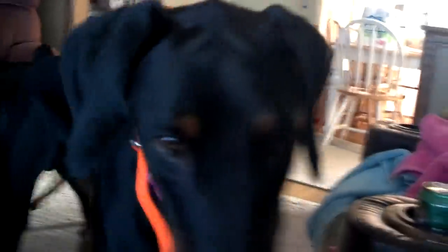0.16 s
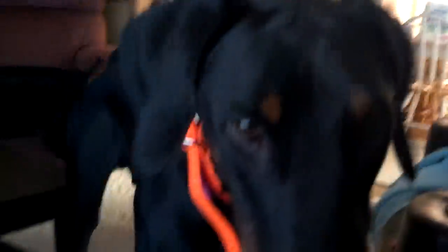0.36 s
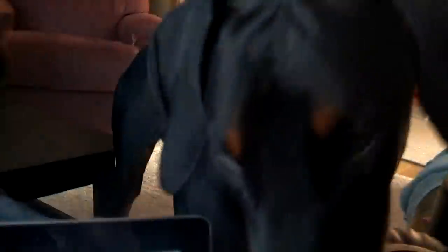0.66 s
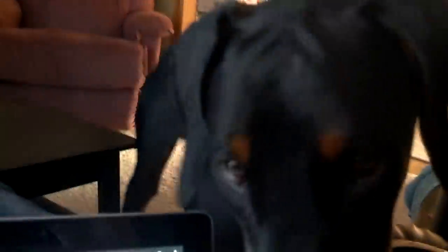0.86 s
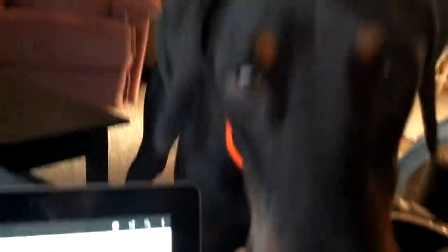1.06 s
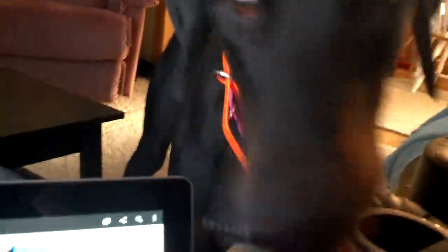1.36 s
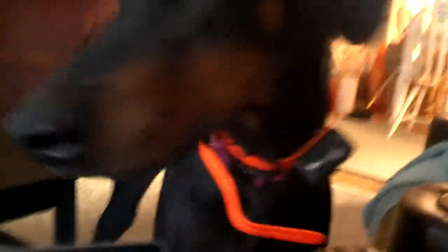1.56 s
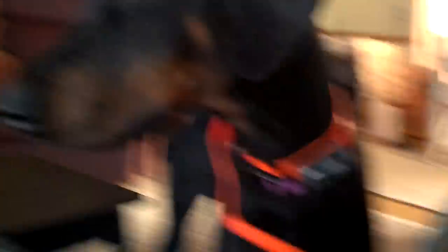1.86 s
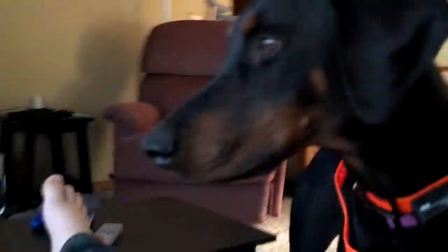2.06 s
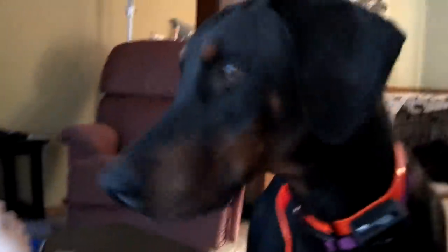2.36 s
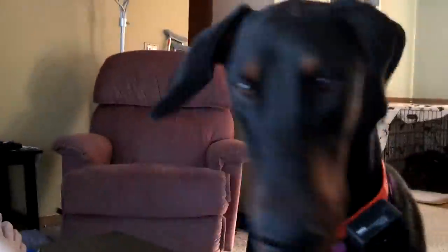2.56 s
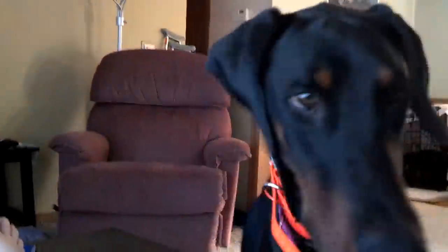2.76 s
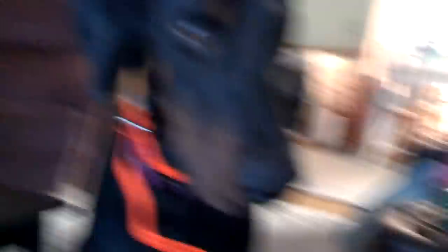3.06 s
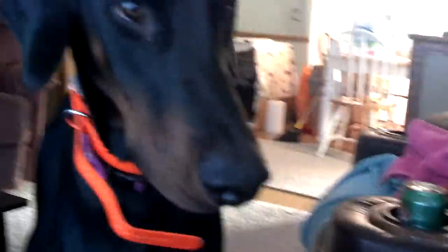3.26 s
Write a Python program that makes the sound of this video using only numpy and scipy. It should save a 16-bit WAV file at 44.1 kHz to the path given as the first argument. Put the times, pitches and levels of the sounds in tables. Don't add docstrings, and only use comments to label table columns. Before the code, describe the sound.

Dog barking indoors: one single bark, a pause, then rapid barks with a second dog's higher yelps.

```python
import sys
import numpy as np
from scipy import signal
from scipy.fft import rfft, irfft
from scipy.io import wavfile
from scipy.ndimage import uniform_filter1d

SR = 44100
rng = np.random.default_rng(int(sys.argv[2]) if len(sys.argv) > 2 else 0)


def materialize(psi):
    bounded = np.clip(np.atleast_2d(psi).T, -1, 1)
    quanta = np.round(bounded * 32767).astype(np.int16)
    wavfile.write(sys.argv[1], SR, quanta)


def magnitude_from_level(level_db):
    exponent = np.asarray(level_db, float) / 20
    return 10 ** exponent


N = 149940


def evened(x):
    return x / np.sqrt(np.mean(x ** 2) + 1e-20)


def colour(x, points):
    f_hz, level_db = np.transpose(points)
    hz = np.fft.rfftfreq(x.shape[-1], 1 / SR)
    gain = magnitude_from_level(np.interp(np.log(hz + 1), np.log(f_hz), level_db))
    return irfft(rfft(x) * gain, x.shape[-1])


def add(mix, start_s, sound):
    part = mix[round(start_s * SR):][:len(sound)]
    part += sound[:len(part)]


def pair(common, other, apart):
    other = colour(other, apart)
    return np.array([common + other, common - other]) / np.sqrt(2)


def floor():
    # [f/Hz, level/dB]
    noise_line = [(30, -21), (70, -19.5), (130, 1.5), (500, -9), (1000, -19.5), (2000, -25), (5000, -34.5),
                  (10000, -39), (15000, -34)]
    # [f/Hz, level/dB]
    noise_apart = [(50, -6.5), (150, -8), (400, -7), (1000, -0.5), (15000, 0)]
    level_db, swell_db, sag_db_per_s = -51, 0.53, -0.5
    t = np.arange(N) / SR
    swell = sum(np.sin(2 * np.pi * (f * t + rng.random())) / np.sqrt(f) for f in np.geomspace(.5, 12, 12))
    noise = evened(colour(rng.standard_normal((2, N)), noise_line))
    gain = magnitude_from_level(level_db + swell_db * evened(swell) + sag_db_per_s * t)
    return gain * pair(*noise, noise_apart)


def resonate(x, hz, width_hz):
    turn = np.exp(2j * np.pi * np.cumsum(hz * np.ones(len(x))) / SR)
    r = np.exp(-np.pi * width_hz / SR)
    return 2 * (turn * signal.lfilter([1 - r], [1, -r], x / turn + 1e-18)).real


def vocal_folds(t, snap_s, hz, rough, half):
    rough_top, lead_rough, jitter = .2, .35, .13
    wobble, breath = rng.standard_normal((12000, 2))[:len(t)].T
    rough = min(rough, rough_top) + lead_rough * np.interp(t, snap_s, [1, 0])
    rough = np.clip(rough, 0, 1)
    wobble = evened(uniform_filter1d(wobble, size=150))
    turns = np.cumsum(hz * (1 + jitter * rough * wobble)) / SR
    folds = 0
    for k in range(1, 44):
        share = half if k % 2 else 1
        folds = folds + share * np.cos(np.pi * k * turns) * (k * hz.max() < 24000)
    puffs = (0.22 + np.exp(-(turns % 1) / 0.45)) * breath
    return (1 - rough) * evened(folds) + rough * evened(puffs)


def bark(throat, rows, rough, half, mouth, tilt_db, nose_db):
    nose_hz, nose_width_hz, nose_level_db = 1740, 110, -22
    flash_db, flash_s, shut_power = 2, 0.032, 0.6
    swell_s, chest_hz = .018, 305.6
    s, pitch_hz, effort_db = np.transpose(rows)
    t = np.arange(s[0], s[-1], 1 / SR)
    hz = uniform_filter1d(np.interp(t, s, pitch_hz), size=300)
    drive = vocal_folds(t, s[1:3], hz, rough, half)
    slope_db = tilt_db + flash_db * np.exp(-abs(t - s[2]) / flash_s)
    nose = (nose_hz / mouth, nose_width_hz, nose_level_db + nose_db)
    out = 0
    for k, (f, width_hz, db) in enumerate([*throat, nose]):
        at_hz = f * (mouth if f > 900 else 1) * (hz / hz.max()) ** shut_power
        ring = resonate(resonate(drive, at_hz, 1.53 * width_hz), at_hz, 1.23 * width_hz)
        out = out + (-1) ** k * magnitude_from_level(db + slope_db * np.log2(f / 500)) * ring
    swell = np.minimum((t - s[0]) / swell_s, 1)
    out = magnitude_from_level(np.interp(t, s, effort_db)) * swell * evened(out)
    return signal.sosfilt(signal.butter(6, chest_hz, "high", fs=SR, output="sos"), out)


def dog(barks, voices, throat):
    out = np.zeros(N)
    for rows, voice in zip(barks, voices):
        add(out, rows[0][0], bark(throat, rows, *voice))
    return out


def deep_dog():
    # [roughness/0-1, half-pitch share/1, mouth opening/1, tilt/dB per octave, nose ring/dB]
    voices = [(0.29, 0.48, 1.132, -1.63, 21), (0.31, .3, 1.07, -0.86, -25.5),
              (0.39, 0.3, 1.072, -1.72, -24), (0.33, 0.41, 1.097, -0.74, 11.5), (0.3, 0.52, 1.04, 1.17, -1),
              (0.62, 0.31, 1.047, -1.3, 21.5)]
    # [f/Hz, width/Hz, level/dB]
    throat = [(361, 130, -10.5), (466, 209, 9.5), (1060, 344, -3.5), (1374, 191, -7), (2110, 437, -21),
              (3094, 167, -32.5), (5290, 1870, -34.5), (6110, 3200, -37.5), (8600, 940, -47)]
    # [t/s, pitch f/Hz, effort level/dB]
    bark_1 = [(.222, 402.5, -28), (.241, 472.8, -25.5), (.249, 508.6, -17), (.265, 540, -20.5),
              (.29, 499.3, -26.5), (.33, 458.5, -29.5), (.35, 454, -49)]
    bark_2 = [(1.478, 344.4, -34.5), (1.514, 429.7, -24), (1.531, 518.7, -18.5), (1.551, 500.8, -25.5),
              (1.589, 461.1, -27.5), (1.642, 450.6, -28), (1.67, 424, -38.5)]
    bark_3 = [(1.728, 392, -4), (1.744, 420.4, -27), (1.754, 506.3, -19.5), (1.779, 481.4, -22),
              (1.808, 453.4, -19.5), (1.84, 457, -27.5), (1.862, 435, -42)]
    bark_4 = [(1.985, 421.2, -12), (2.002, 500, -22), (2.01, 534.6, -18.5), (2.035, 499.6, -24.5),
              (2.062, 453, -24.5), (2.109, 424.5, -41)]
    bark_5 = [(2.232, 378.6, -23), (2.266, 450.2, -28), (2.282, 530.1, -18.5), (2.311, 520.8, -28.5),
              (2.35, 440.2, -30), (2.398, 401, -39)]
    bark_6 = [(2.645, 404, -25.5), (2.668, 448.5, -24.5), (2.692, 526, -18), (2.722, 533.1, -27),
              (2.755, 522, -23.5), (2.811, 496, -65.5)]
    return dog([bark_1, bark_2, bark_3, bark_4, bark_5, bark_6], voices, throat)


def room(x):
    # [f/Hz, t60/s]
    decay = [(200, 0.99), (520, 0.39), (800, 0.7), (1200, 0.47), (2000, 0.57), (4000, 0.4), (8000, 0.68),
             (14000, 0.1)]
    # [f/Hz, level/dB, t60/s]
    tones = [(469.5, -2, 0.43), (522, -1.5, 0.32), (839, -3.5, 0.49), (806, -13, 0.84), (847, 3, 1),
             (1095, -14.5, .55), (1307, 0.5, 1), (1557, -2, 0.5), (1830, -5, .6)]
    # [f/Hz, level/dB]
    room_apart = [(100, -33.5), (500, -21), (1200, 2), (2500, 8.5), (5000, 9), (15000, -5)]
    tail_db, ring_db = 0.41, -10
    taps = np.zeros((2, SR))
    at = np.arange(200, SR - 20, 20) + rng.integers(0, 20, (2, (SR - 201) // 20))
    np.put_along_axis(taps, at, rng.choice([-1., 1.], at.shape), 1)
    hz, frame_s, z = signal.stft(taps, SR, nperseg=256)
    f_hz, t60_s = np.transpose(decay)
    fade = magnitude_from_level(-60 * frame_s / np.interp(hz, f_hz, t60_s)[:, None])
    tail = signal.istft(z * fade, SR, nperseg=256)[1][:, :SR]
    tail = magnitude_from_level(tail_db) * tail / np.linalg.norm(tail[0])
    t = np.arange(SR) / SR
    rings = sum(magnitude_from_level(db - 60 * t / t60) * np.sin(2 * np.pi * f * t) for f, db, t60 in tones)
    tail = tail + magnitude_from_level([[ring_db - 59], [ring_db - 57.5]]) * rings
    wet = signal.fftconvolve(x[None], tail, axes=1)[:, :N]
    return pair(*wet, room_apart)


def ports(x, lead_s):
    turn = np.exp(1j * np.pi * np.fft.rfftfreq(N, 1 / SR) * lead_s)
    return irfft(rfft(x) * np.array([turn, 1 / turn]), N)


def ticks():
    # [t/s, level/dB, f/Hz, t60/s]
    hits = [
        (.7112, -47, 1350, .03),
        (.7112, -53, 5800, .006),
        (.7112, -55, 3900, .012),
        (.737, -43, 2700, .012),
        (.738, -42, 400, .05),
        (1.365, -58, 9000, .006),
        (2.0, -46, 150, .1),
        (3.315, -39, 330, .14),
        (3.335, -41, 210, .15),
        (3.322, -47, 520, .08),
    ]
    out = np.zeros(N)
    t = np.arange(6000) / SR
    for s, db, hz, t60_s in hits:
        add(out, s, magnitude_from_level(db - 60 * t / t60_s) * np.sin(2 * np.pi * hz * t))
    return out


def huffs():
    # [t/s, length/s, level/dB, rise/s]
    breaths = [
        (1.87, .14, -55, 0.062),
        (2.24, 0.43, -47, 0.053),
        (2.995, .16, -53.5, 0.091),
    ]
    # [f/Hz, level/dB]
    air_line = [(300, -14), (1500, -6), (3000, -3.5), (6500, -3.5), (10000, 1), (13000, 0), (15000, 1.5)]
    fall_s, flutter_db = 0.087, 0.5
    air = evened(colour(rng.standard_normal(N), air_line))
    flutter = magnitude_from_level(flutter_db * evened(uniform_filter1d(rng.standard_normal(N), size=900)))
    gain = np.zeros(N)
    for s, length_s, db, rise_s in breaths:
        t = np.arange(0, length_s, 1 / SR)
        shape = np.minimum(t / rise_s, (length_s - t) / fall_s)
        add(gain, s, np.minimum(shape, 1) * magnitude_from_level(db))
    return gain * air * flutter


def high_dog():
    # [roughness/0-1, half-pitch share/1, mouth opening/1, tilt/dB per octave, nose ring/dB]
    voices = [(0.14, 0.11, 0.965, 0.37, .1), (0.13, 0.03, 1.02, .1, .1)]
    # [f/Hz, width/Hz, level/dB]
    throat = [(796, 533, 4.5), (1480, 1085, -5.5), (2570, 1500, -25.5), (3060, 1720, -22),
              (5400, 3600, -42), (6720, 330, -34.5), (9080, 840, -33.5)]
    # [t/s, pitch f/Hz, effort level/dB]
    yelp_1 = [(2.632, 520.6, -32.5), (2.648, 662.5, -30), (2.672, 772.5, -31), (2.72, 794.3, -35.5),
              (2.78, 756, -38.5)]
    yelp_2 = [(3.038, 564.6, -33), (3.053, 693, -32.5), (3.072, 816.2, -28), (3.102, 833, -32),
              (3.132, 808.7, -32), (3.154, 784, -35.5), (3.178, 752, -45)]
    return dog([yelp_1, yelp_2], voices, throat)


def scene():
    deep_lead_s, near_lead_s, high_lead_s = .00013, -.00005, .00002
    near_wet = .2
    deep = deep_dog()
    near = ticks() + huffs()
    high = high_dog()
    out = floor() + ports(deep + room(deep), deep_lead_s)
    out = out + ports(near + near_wet * room(near), near_lead_s)
    return out + ports(high + room(high), high_lead_s)


def band_limit(x):
    return signal.sosfilt(signal.butter(12, 17050, fs=SR, output="sos"), x)


def record(dry):
    cross_samples, edge_hz = 16, 15790
    late = np.pad(dry[::-1], ((0, 0), (cross_samples, 0)))[:, :N]
    edge = signal.firwin(511, edge_hz, window=("kaiser", 9), fs=SR)[None]
    mix = signal.oaconvolve(dry - late, edge, "same")
    return band_limit(mix)


dry = scene()
out = record(dry)
materialize(out)
```